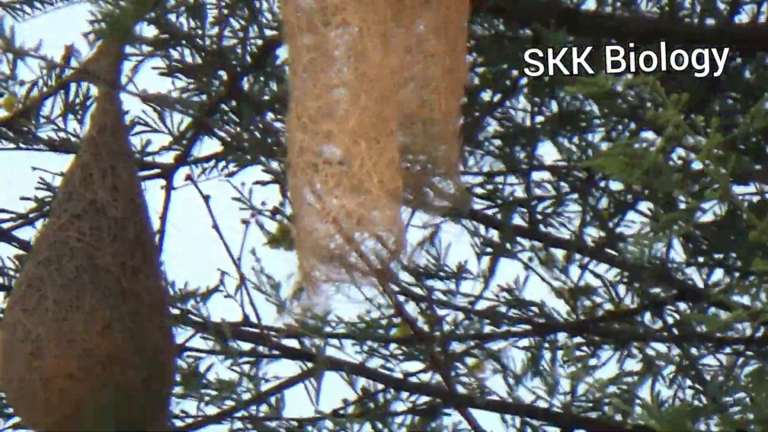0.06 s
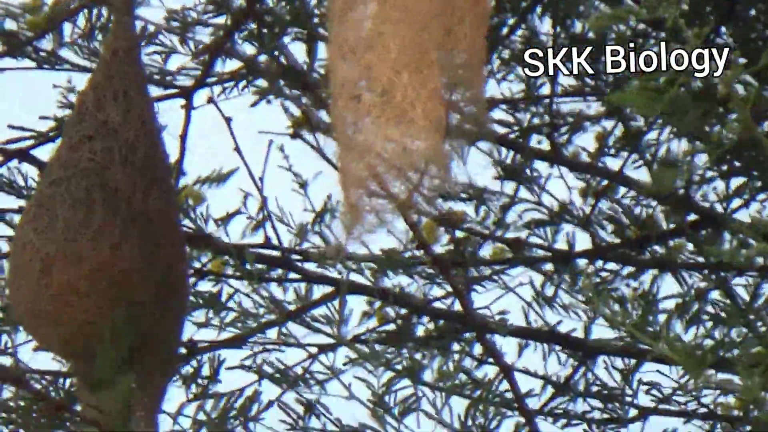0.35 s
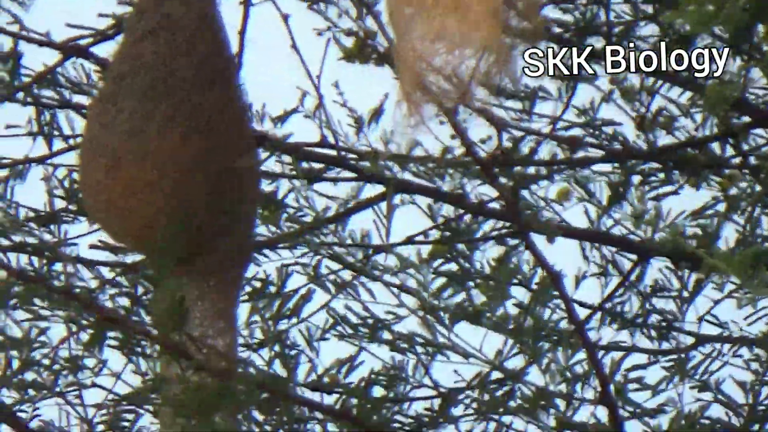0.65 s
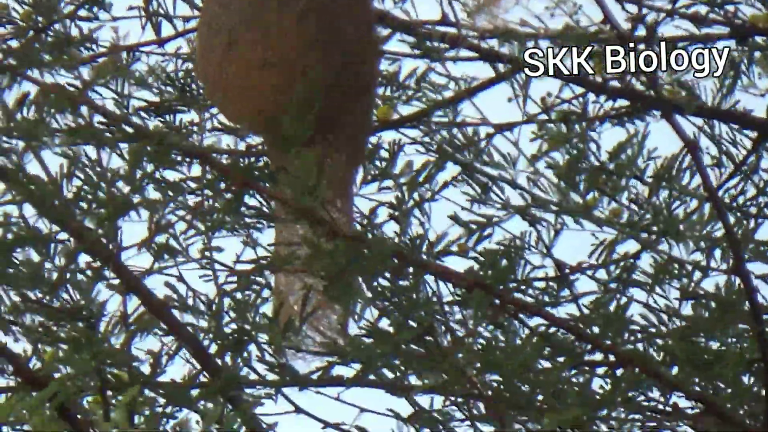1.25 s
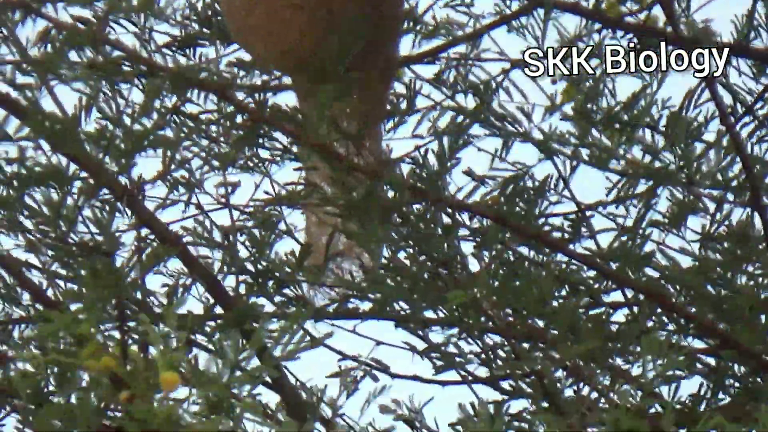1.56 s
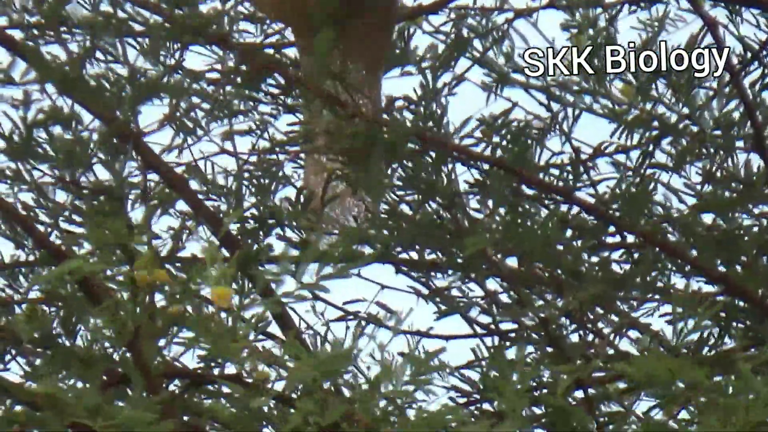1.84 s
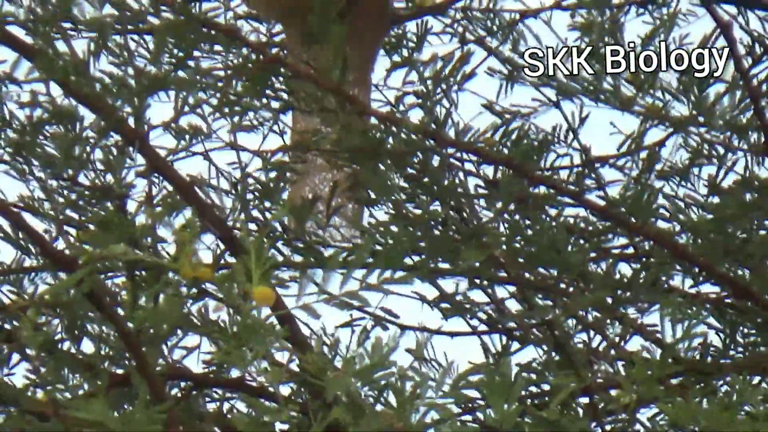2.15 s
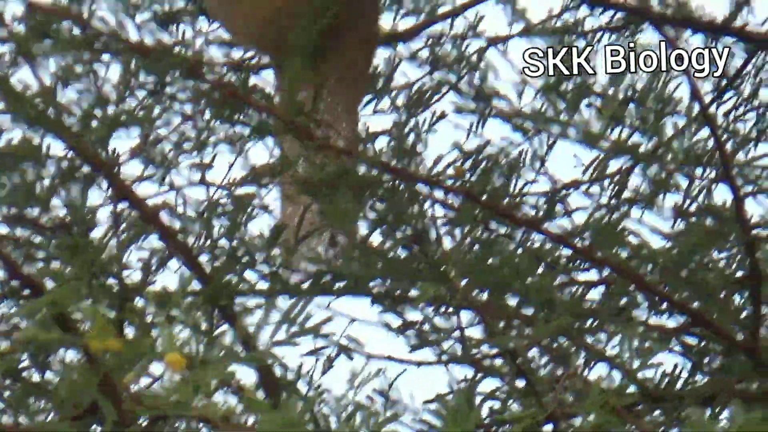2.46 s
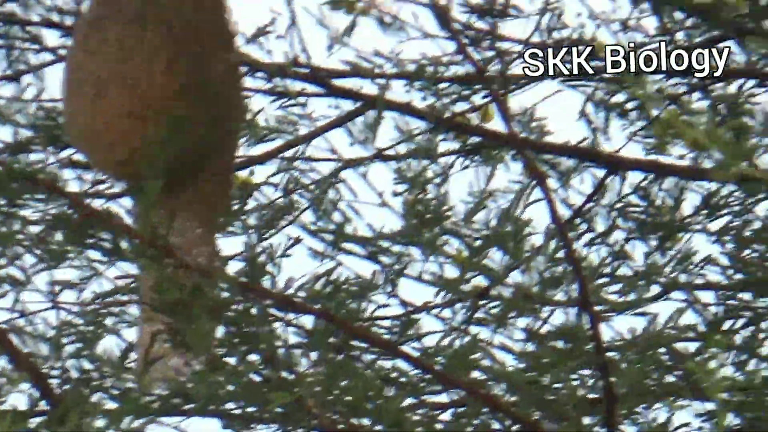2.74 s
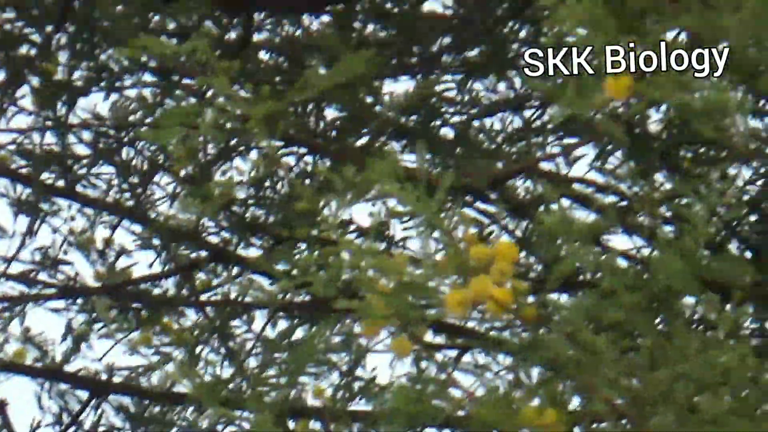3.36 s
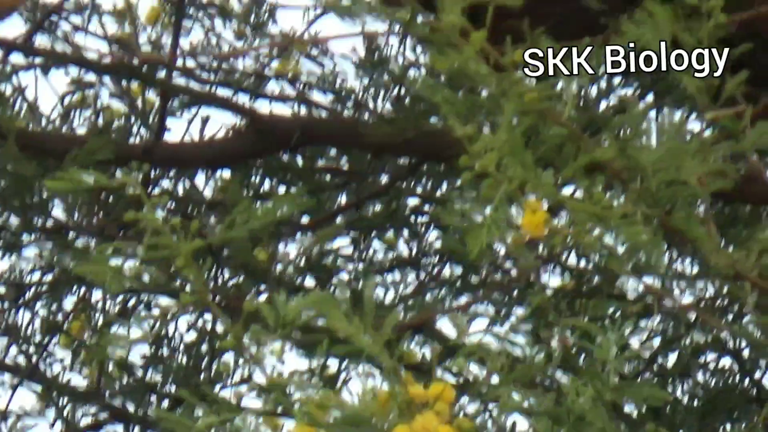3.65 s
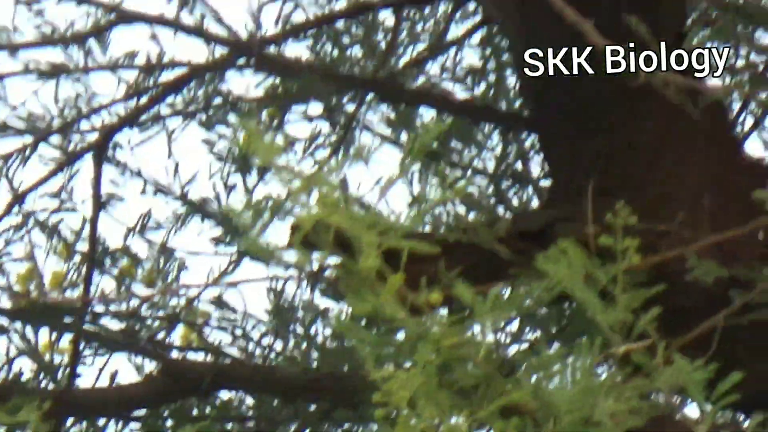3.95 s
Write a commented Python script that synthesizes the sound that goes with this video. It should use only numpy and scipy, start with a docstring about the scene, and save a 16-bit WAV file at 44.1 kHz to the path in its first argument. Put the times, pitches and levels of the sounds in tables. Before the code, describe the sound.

Small birds chatter in a tree in high, squeaky, overlapping bursts. One draws out a wheeze at the start, thin whistles follow, and one faintly flutters off near the end. Wind and handling rumble softly on the microphone.

```python
"""A colony of weaver birds chatters in a thorny tree: short notes that rise and fall, clean or rasping,
sung in bursts by the two sides of each bird's voice box. One bird draws out a wheeze, others slip in
low chirps and thin whistles, and one flutters off. Leaves and branches scatter the calls. Wind and
handling rumble softly on the microphone, over quiet countryside and a brief, faint hum."""
import sys
import numpy as np
from scipy import signal
from scipy.fft import rfft, irfft
from scipy.io import wavfile

SR = 44100
rng = np.random.default_rng(int(sys.argv[2]) if len(sys.argv) > 2 else 0)


def log_audio(samples):
    """Write samples as a 16-bit WAV file to the path given in sys.argv[1]."""
    # one column per channel
    frames = np.atleast_2d(samples).T
    # limit to full scale, then quantise
    limited = np.clip(frames, -1, 1)
    pcm = np.round(limited * 32767).astype(np.int16)
    wavfile.write(sys.argv[1], SR, pcm)


N = 176400
T = np.arange(N) / SR
FREQS = np.arange(N // 2 + 1) * SR / N


def gain(db):
    """Turn decibels into a number to multiply by."""
    return 10 ** (np.asarray(db) / 20)


def unit(x):
    """Scale a signal so its average power is 1."""
    return x / np.sqrt(np.mean(x ** 2))


def colour(x, curve):
    """Turn lows and highs up or down along a curve of (frequency [Hz], level [dB]) points."""
    hz, db = np.array(curve, float).T
    return irfft(rfft(x) * gain(np.interp(np.log(FREQS + 1), np.log(hz), db)), N)


def noise(curve):
    """Steady noise with the given tone colour."""
    return unit(colour(rng.standard_normal(N), curve))


def wander(hz):
    """A smooth random wobble, up to about this fast."""
    return unit(irfft(rfft(rng.standard_normal(N)) * np.exp(-.5 * (FREQS / hz) ** 2), N))


def phase(hz):
    """The growing angle of a wave that follows a pitch."""
    return 2 * np.pi * np.cumsum(hz) / SR


def stereo(mid, side):
    """Make left and right from what they share (mid) and what sets them apart (side)."""
    return np.array([mid + side, mid - side])


def arch(at, length, depth):
    """One note: its samples, its pitch bend and its swell. Both peak at the time `at`."""
    rise = .34  # share of the note before the peak
    place = (T - at) / length
    i = np.flatnonzero((place > -rise) & (place < 1 - rise))
    from_peak = np.maximum(-place[i] / rise, place[i] / (1 - rise))
    bend = 1 - depth * np.sin(2.6 * place[i]) ** 2
    swell = np.sqrt(2) * np.abs(np.cos(np.pi / 2 * from_peak)) ** .76
    return i, bend, swell


# How throat and beak shape the voice (frequency [Hz], level [dB])
BEAK_COLOUR = [(2000, -13), (3100, -2.5), (5300, 1.5), (5950, 4), (7000, 2), (10500, -2.5), (13500, -18)]
# The chatter notes (peak time [s], length [s], top pitch [Hz], level [dB])
CHATTER_NOTES = [(0.006, 0.064, 4440, -30.5), (0.052, 0.077, 4500, -30.5), (0.119, 0.049, 4880, -35),
                 (0.4, 0.063, 4760, -33.5), (0.538, 0.056, 5340, -31.5), (0.577, 0.045, 4560, -28),
                 (0.691, 0.069, 5140, -36.5), (0.798, 0.048, 5310, -35), (0.818, 0.068, 4634, -33.5),
                 (0.898, 0.053, 5410, -29.5), (0.93, 0.062, 4510, -29), (0.98, 0.052, 4670, -31.5),
                 (1.007, 0.082, 4640, -31), (1.06, 0.077, 5200, -35.5), (1.096, 0.081, 4965, -35.5),
                 (1.175, 0.08, 4566, -30.5), (1.329, 0.03, 4700, -35), (1.354, 0.04, 5160, -29),
                 (1.392, .06, 5070, -29), (1.58, 0.021, 4430, -32), (1.602, 0.053, 4777, -29.5),
                 (1.627, 0.031, 4520, -30), (1.657, 0.02, 4230, -32.5), (1.697, 0.062, 5130, -36),
                 (1.762, 0.082, 5250, -30.5), (1.801, 0.094, 4943, -28.5), (1.858, 0.062, 5130, -32),
                 (1.874, 0.084, 4554, -34.5), (2.128, 0.051, 4520, -31.5), (2.164, 0.029, 4320, -33.5),
                 (2.228, 0.083, 4810, -35.5), (2.273, 0.038, 5026, -31), (2.305, 0.071, 5120, -29.5),
                 (2.372, 0.063, 4790, -32), (2.41, 0.064, 5100, -31.5), (2.437, 0.075, 4480, -32),
                 (2.501, 0.058, 5430, -32.5), (2.534, 0.057, 4990, -34), (2.616, 0.083, 4545, -30.5),
                 (2.653, 0.093, 4555, -30), (2.72, 0.073, 4420, -32), (2.93, 0.056, 5050, -32),
                 (2.994, 0.11, 4050, -35.5), (3.032, 0.056, 4604, -30.5), (3.058, 0.06, 4595, -29),
                 (3.099, 0.026, 4420, -30.5), (3.161, 0.038, 4750, -32), (3.198, 0.064, 4430, -31),
                 (3.504, 0.079, 4890, -37.5), (3.547, 0.073, 4720, -36.5), (3.597, 0.058, 4690, -35),
                 (3.747, 0.074, 4830, -31), (3.779, 0.091, 4660, -32.5), (3.833, 0.085, 5090, -27),
                 (3.886, 0.046, 4440, -28)]

def chatter():
    """Both sides of the voice box mix into squeaky overtones. Louder notes add low voice and rasp."""
    rasp_hz, clean_db, harsh_db = 150, -35.5, -27.5
    shake = phase(rasp_hz * (1 + .25 * wander(20)))
    jitter, brightness = wander(600), gain(3 * wander(20))
    twists = [wander(65), wander(65)]  # each side's pitch wobbles separately
    hiss = rng.standard_normal(N)
    out = np.zeros(N)
    for (at, length, hz, db), offset in zip(CHATTER_NOTES, rng.integers(N, size=len(CHATTER_NOTES))):
        i, bend, swell = arch(at, length, depth=.3)
        own = (i + offset) % N  # every note wobbles in its own way
        effort = np.clip((db - clean_db) / (harsh_db - clean_db), .3, 1)
        rasp = effort * (.08 * np.sin(shake[own]) + .035 * jitter[own])
        high, low = (hz * bend * (1 + .06 * twist[own] + rasp) for twist in twists)
        low_voice = gain(-6) * np.sqrt(effort) * np.exp(1j * phase(.8 * low))
        voice = np.exp(1j * phase(high)) + low_voice
        overtones = gain(-15) * voice ** 2 + gain(-15.5) * voice ** 3
        tone = (voice + brightness[own] * overtones).imag
        breath = gain(-20) * 2 * effort * hiss[own]
        pulsing = 1 + .55 * effort * np.cos(shake[own])
        out[i] += gain(db) * swell * pulsing * (tone + breath)
    return colour(out, BEAK_COLOUR) * gain(1)


# The rumble's tone colour (frequency [Hz], level [dB])
RUMBLE_COLOUR = [(25, -12), (80, -4.5), (170, -12.5), (700, -37.5)]
# Thumps on the microphone (time [s], half-width [s], level [dB])
THUMPS = [(.21, 0.29, -41), (.43, 0.019, -35.5), (0.534, 0.0044, -31.5), (0.635, 0.045, -32),
          (1.478, 0.028, -38), (3.253, 0.03, -40)]

def rumble():
    """Wind and handling shake the microphone: a steady rumble and a few soft thumps."""
    mid, side = (noise(RUMBLE_COLOUR + [(SR / 8, -90)]) for _ in range(2))
    side = colour(side, [(70, -17), (200, -3)]) * gain(-4) * np.sqrt(2)
    thumps = sum(gain(db) * np.exp(-.5 * ((T - at) / width) ** 2) for at, width, db in THUMPS)
    return stereo(mid, side) * (gain(-50.5) + thumps)


# The countryside's tone colour (frequency [Hz], level [dB])
AIR_COLOUR = [(18, -8), (30, 8), (92, 6.5), (260, -13), (645, -5.5), (2080, -14), (4310, -13.5),
              (8250, -13.5), (15000, -30)]

def air():
    """The steady hush of distant countryside, widest in the low-middle pitches."""
    mid, side = noise(AIR_COLOUR), noise(AIR_COLOUR)
    side = colour(side, [(50, -40), (250, 5), (2000, -2)]) * gain(-6)
    return stereo(mid, side) * gain(-47.5 + wander(.75))


def far_birds():
    """Faint, mostly falling chirps from deeper in the colony, at random times."""
    count, low_hz, high_hz = 44, 3600, 8000
    out = np.zeros(N)
    for when, pitch, strength in rng.random((count, 3)):
        at, hz = when * N / SR, low_hz + pitch * (high_hz - low_hz)
        i, bend, swell = arch(at, length=.055, depth=.2)
        bend = np.where(T[i] < at, np.sqrt(bend), bend)  # flatten the rise
        out[i] += gain(-48) * strength * swell * np.sin(phase(hz * bend))
    return out


# Close echoes of the wheeze (delay [s], level [dB])
WHEEZE_ECHOES = [(.004007, -12), (.01202, -5)]
# The course of the wheeze (time [s], high voice's pitch [Hz], level [dB])
WHEEZE_PATH = [(.05, 5300, -40.5), (0.262, 5330, -34.5), (.38, 5670, -34), (0.622, 5727, -31.5),
               (0.951, 5460, -34.5)]

def wheeze():
    """Both sides of the voice box buzz, one thin and high, one hoarse and lower. Echoes make them ring."""
    times, hz, db = np.array(WHEEZE_PATH).T
    low_hz = 4433
    high = phase(np.interp(T, times, hz) * (1 + .042 * wander(880)))
    low = phase(low_hz * (1 + .15 * wander(890)))
    spectrum = rfft(np.sin(high) + gain(1.5) * np.sin(low) + gain(-14) * np.sin(2 * low))
    for delay, echo_db in WHEEZE_ECHOES:  # each echo repeats and fades
        spectrum /= 1 - gain(echo_db) * np.exp(-2j * np.pi * FREQS * delay)
    return unit(irfft(spectrum, N)) * gain(np.interp(T, times, db, right=-120))


# The tones in a chirp, at 1, 2, 3 and 4 times its pitch (level [dB])
CHIRP_HARMONICS = [-15, -2, -20, -17]
# The low chirps (peak time [s], length [s], top pitch [Hz], level [dB])
CHIRPS = [(0.207, 0.077, 2150, -30.5), (0.403, 0.035, 1818, -43)]

def chirps():
    """Low, gently arched calls, strongest at twice their pitch."""
    out, waver = np.zeros(N), 1 + .017 * wander(320)
    for at, length, hz, db in CHIRPS:
        i, bend, swell = arch(at, length, depth=.15)
        angle = phase(hz * bend * waver[i])
        tone = sum(gain(level) * np.sin(k * angle) for k, level in enumerate(CHIRP_HARMONICS, 1))
        out[i] += gain(db) * swell * tone
    return out


# The course of the hum (time [s], pitch [Hz], level [dB])
HUM_PATH = [(0.682, 308, -48), (0.76, 285.8, -44.5), (0.869, 237.9, -48.5), (1.252, 204.6, -56.5)]

def hum():
    """A faint low tone that wavers as it slides down."""
    times, hz, db = np.array(HUM_PATH).T
    pitch = np.interp(T, times, hz) * (1 + .061 * wander(45))
    level = np.interp(T, times, db, left=-120, right=-120) + 2 * wander(40)
    return np.sin(phase(pitch)) * gain(level)


# The thin whistles (peak time [s], length [s], top pitch [Hz], level [dB])
WHISTLES = [(1.526, 0.11, 6770, -32), (1.374, 0.048, 7280, -32.5), (2.86, 0.038, 7170, -38.5),
            (2.908, 0.079, 6900, -30), (3.335, 0.077, 5850, -37.5), (3.475, 0.067, 6850, -40),
            (3.576, .07, 7970, -36), (3.703, 0.1, 6720, -38.5), (3.945, 0.049, 6840, -37.5)]

def whistles():
    """Thin, nearly pure notes above the chatter."""
    out, waver = np.zeros(N), 1 + .016 * wander(500)
    for at, length, hz, db in WHISTLES:
        i, bend, swell = arch(at, length, depth=.2)
        bend = np.where(T[i] < at, bend ** .25, bend)  # flatten the rise
        out[i] += gain(db) * swell ** 2 / 2 * np.sin(phase(hz * bend * waver[i]))
    return out


# The wingbeats (time [s])
WINGBEATS = [3.185, 3.246, 3.295, 3.353, 3.397, 3.455, 3.497]

def wings():
    """A bird flies off, each wingbeat pushing a soft puff of air."""
    puff_hz, half_width_s = 1360, .0056
    whoosh = noise([(puff_hz / 4, -14), (puff_hz, 0), (puff_hz * 2, -14), (puff_hz * 6, -35)])
    beats = sum(np.exp(-.5 * ((T - at) / half_width_s) ** 2) for at in WINGBEATS)
    return gain(-47) * whoosh * beats


# How wide the birds sound (frequency [Hz], side level [dB])
BIRD_WIDTH = [(5500, -18.5), (8000, -8), (12000, -12)]

def foliage(birds):
    """Leaves and branches scatter a short echo; high sounds reach left and right out of step."""
    gap_s, fade_s = .0025, .15  # the echo falls to a thousandth in fade_s
    t = T[:SR // 2]
    tails = rng.standard_normal((2, len(t))) * np.exp(-np.log(1000) * t / fade_s) * (t > gap_s)
    tails *= gain(-7) / np.linalg.norm(tails, axis=1, keepdims=True)
    mid_echo, side_echo = (signal.fftconvolve(birds, tail)[:N] for tail in tails)
    out_of_step = signal.hilbert(birds).imag  # every wave shifted by a quarter cycle
    return stereo(birds + mid_echo, colour(out_of_step + 2 * side_echo, BIRD_WIDTH))


def scene():
    """All the birds in their tree, over rumble, distant air and the hum."""
    birds = chatter() + far_birds() + whistles() + chirps() + wheeze() + wings()
    return foliage(birds) + hum() + rumble() + air()


def record(dry):
    """The recorder cuts off the very highest sounds."""
    top_hz = 15650
    return signal.sosfilt(signal.ellip(10, .2, 80, top_hz, fs=SR, output="sos"), dry)


dry = scene()
out = record(dry)
log_audio(out)
```